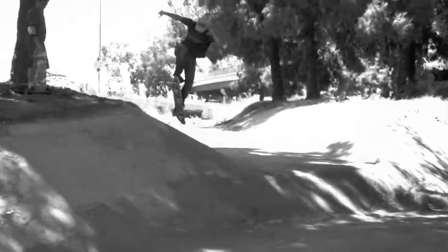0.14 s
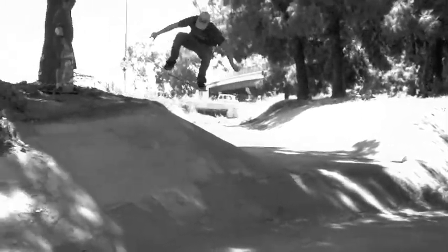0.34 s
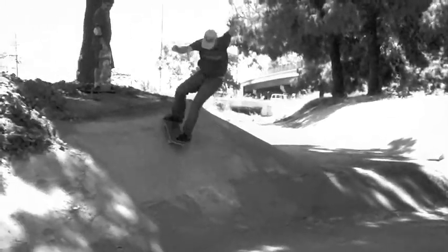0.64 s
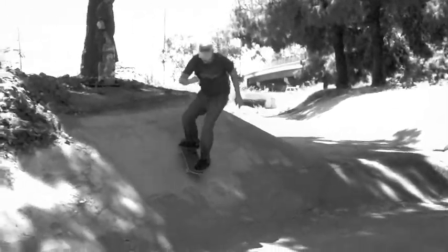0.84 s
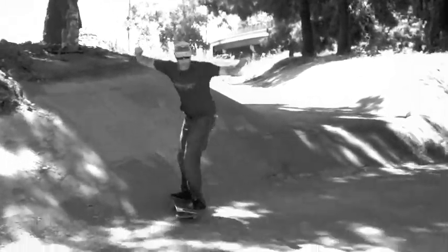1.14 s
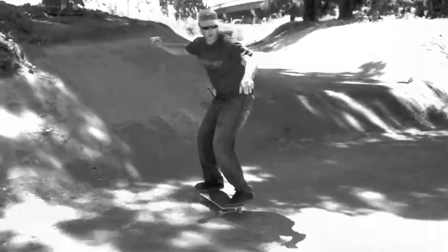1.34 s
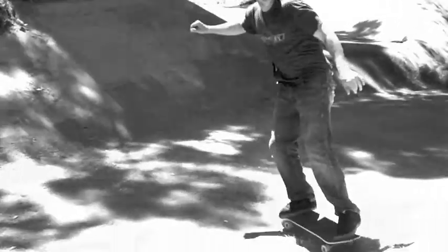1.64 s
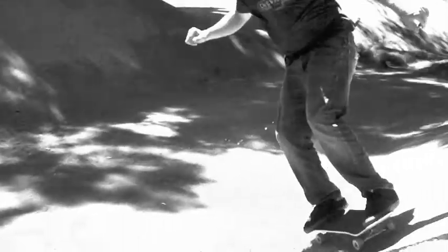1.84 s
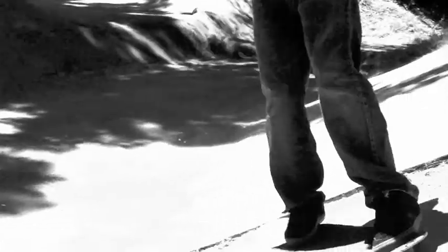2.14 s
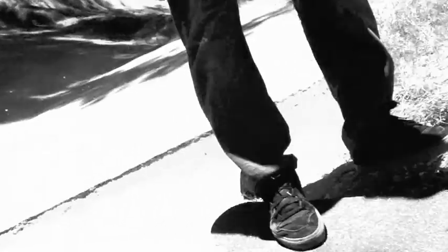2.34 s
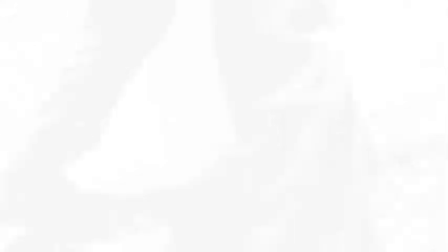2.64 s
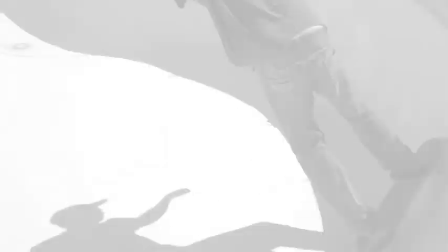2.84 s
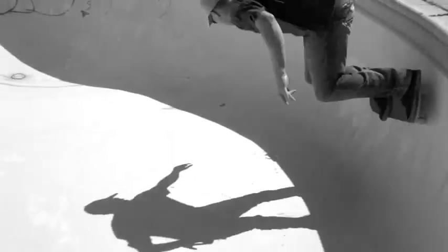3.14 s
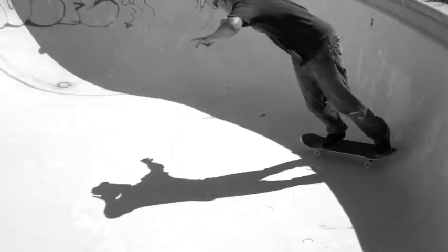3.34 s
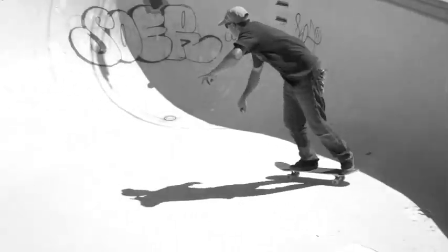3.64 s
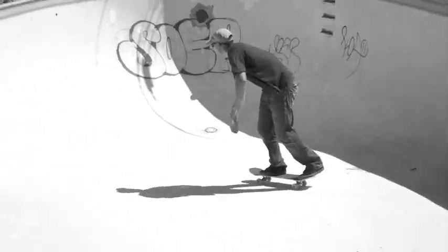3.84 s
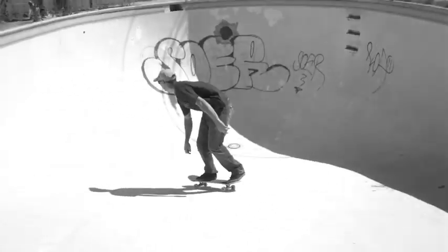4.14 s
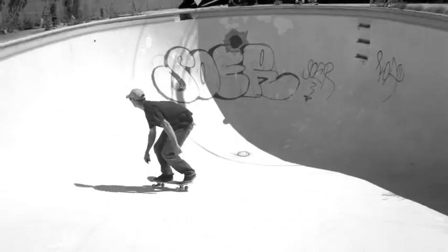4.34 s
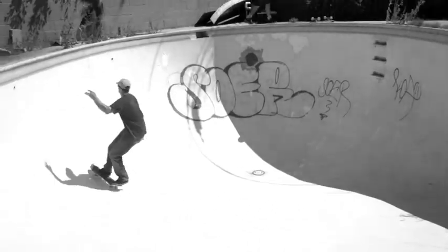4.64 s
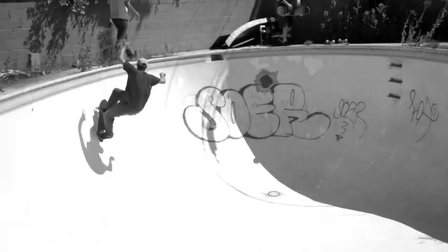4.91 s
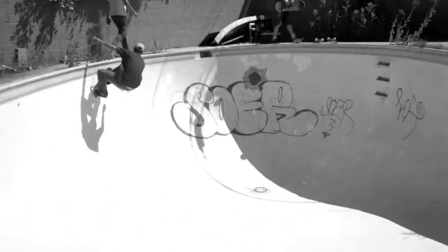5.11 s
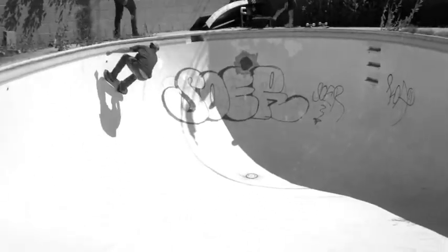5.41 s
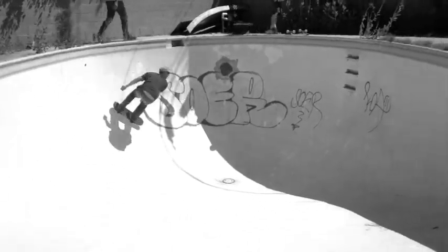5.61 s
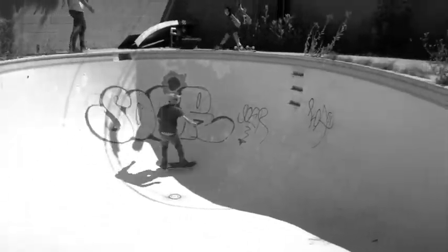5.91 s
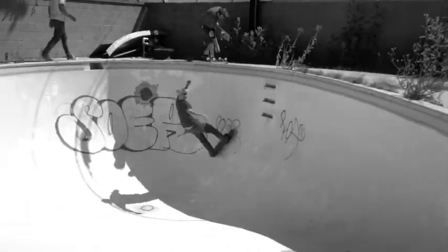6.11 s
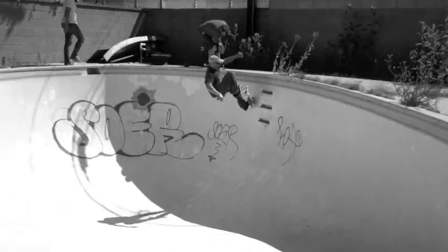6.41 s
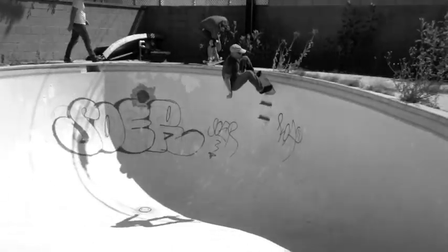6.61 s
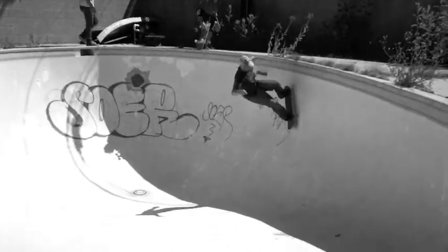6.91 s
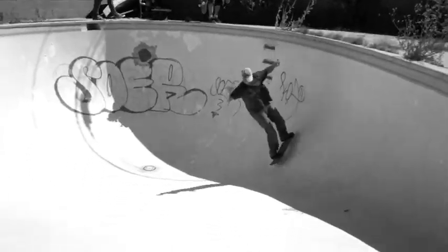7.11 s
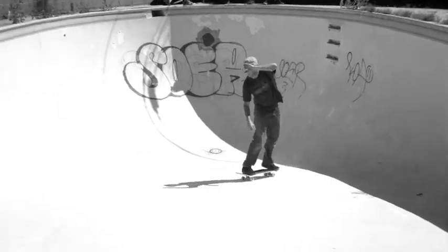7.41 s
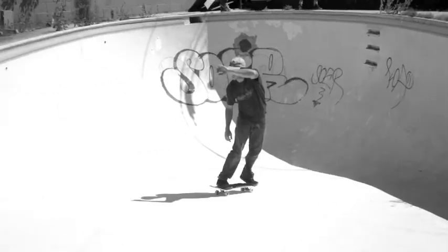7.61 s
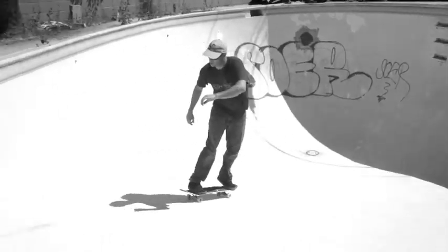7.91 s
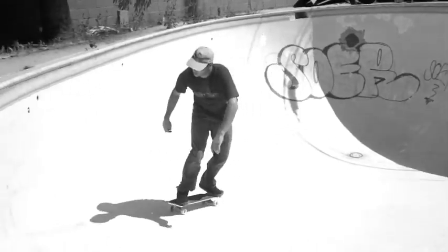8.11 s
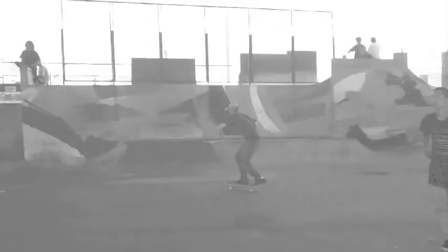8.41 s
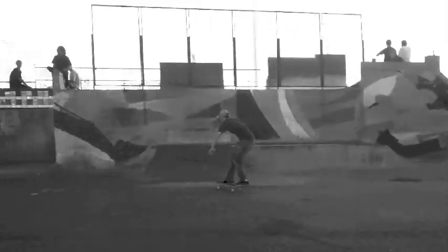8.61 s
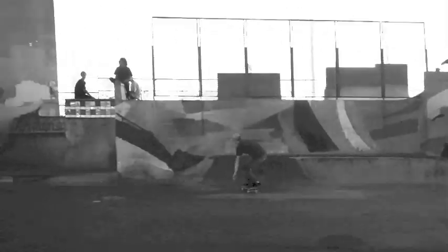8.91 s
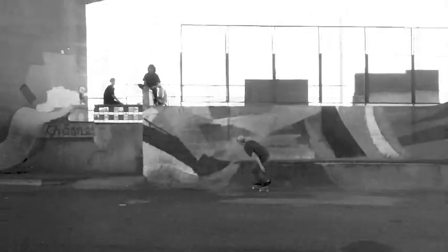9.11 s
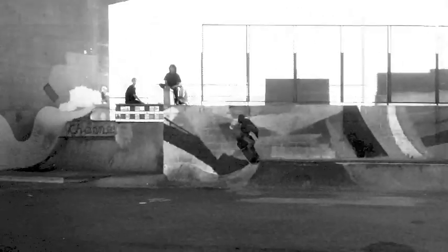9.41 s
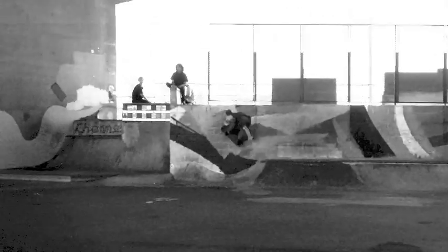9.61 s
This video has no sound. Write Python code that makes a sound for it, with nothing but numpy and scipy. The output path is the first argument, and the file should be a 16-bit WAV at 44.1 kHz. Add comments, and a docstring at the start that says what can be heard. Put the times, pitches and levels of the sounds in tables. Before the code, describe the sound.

Three skateboard runs on outdoor concrete, picked up in stereo. First come a loud deck clack and a gritty wheel rumble dotted with knocks. The sound cuts out for an instant, then returns in an empty pool, where steel trucks clink and the wheels swell, growl and scrape through turns, easing off before a clattering landing. Last, coasting wheels hum and sink slightly in pitch, with soft thumps and closing knocks from the board.

```python
"""Three skateboard runs. First a concrete ditch: hard wheels roar over the grain, tick on pebbles, growl
and skid in the turns; the deck clacks on take-offs and landings. After a brief silence, from 2.4 s, an
empty swimming pool: the trucks clink on its edge and the wheels carve through more turns. From 7.8 s a
skate park: the coasting wheels drone, sinking in pitch, and the deck clacks again near the end.
A closely spaced stereo microphone picks it all up."""
import sys
import numpy as np
from scipy import signal
from scipy.fft import rfft, irfft, next_fast_len
from scipy.io import wavfile
from scipy.ndimage import uniform_filter1d

SR = 44100
rng = np.random.default_rng(int(sys.argv[2]) if len(sys.argv) > 2 else 0)


def generate_wav(sig):
    """Save sig (samples, or channels by samples) to the path in sys.argv[1] as 16-bit PCM at SR."""
    pcm = np.round(np.clip(np.atleast_2d(sig).T, -1, 1) * 32767).astype(np.int16)
    wavfile.write(sys.argv[1], SR, pcm)


N = 429975
TIME_S = np.arange(N) / SR
DITCH_SPAN_S, POOL_SPAN_S, PARK_SPAN_S = (0, 2.303), (2.378, 7.96), (7.83, 9.76)

# Rolling level, set by speed, load and nearness. Each row: time in seconds, level in dB.
DITCH_ROLL = [(0, -34), (.4, -35), (.55, -32), (.7, -42), (1.1, -33.5), (1.4, -39), (1.53, -39), (1.7, -29),
              (1.86, -37.5), (2.03, -34.5), (2.28, -29.5)]
POOL_ROLL = [(2.44, -33.5), (2.6, -41.5), (2.8, -36.5), (2.94, -29.5), (3.22, -34.5), (3.37, -30.5),
             (3.6, -35), (3.95, -38), (4.68, -35), (4.96, -26.5), (5.1, -35), (5.28, -27.5), (5.37, -37.5),
             (5.8, -26.5), (6.04, -27.5), (6.15, -26.5), (6.32, -27.5), (6.48, -38.5), (6.75, -47.5),
             (7.05, -37), (7.38, -31), (7.52, -38), (7.85, -37)]
PARK_ROLL = [(7.88, -33.5), (8.1, -30), (8.5, -30), (9.1, -32), (9.55, -32), (9.75, -34)]
# Treble. Each row: time in seconds, grit hiss gain in dB, finest hiss gain in dB.
TREBLE = [(0, 1.5, -10.5), (.6, 0, -9.5), (1.25, 0.5, -0.5), (1.7, -0.5, 5), (2.7, 1.5, 2.5), (3.3, 6, -1),
          (3.95, -4, 2), (4.2, 2.5, -3), (4.7, -1, 1.5), (5.12, 3.5, 1), (5.27, 2.5, 1.5),
          (5.37, 0.5, -0.5), (5.7, -2.5, 3), (6.15, -1, -6), (6.9, 11, -5), (7.25, -2, -3.5),
          (7.7, -1.5, 5), (8.4, -2.5, 2), (9.75, 1, 3)]
# Steel and alloy trucks. Each row: frequency in Hz, gain in dB, t60 in seconds.
TRUCK_MODES = [(3350, -24, 0.015), (3650, 7, 0.033), (4010, 9, 0.01), (6690, 10.5, 0.023)]
# Hard contact of urethane, steel and concrete. Each row: frequency in Hz, gain in dB.
CRACK_TONE = [(1200, -32), (2600, 10), (3200, 5.5), (3650, -4.5), (4300, 2), (5000, -9.5), (6700, -9.5),
              (8500, -6.5), (10000, -19), (14000, -12.5)]


def from_db(db):
    """Decibels to gain."""
    return np.exp(np.asarray(db) * (np.log(10) / 20))


def rms_one(x):
    """Scale to unit power."""
    return x / np.sqrt(np.mean(x ** 2) + 1e-20)


def peak_one(x):
    """Scale the loudest 3 ms to unit power."""
    return x / np.sqrt(uniform_filter1d(x ** 2, size=132).max() + 1e-20)


def evened(x):
    """Level out over 50 ms, keeping faster roughness."""
    return x / np.sqrt(uniform_filter1d(x ** 2, size=2205) + 1e-9)


def curve(rows, t, column=1):
    """Read a (seconds, value, ..) table at times t."""
    columns = np.transpose(rows)
    return np.interp(t, columns[0], columns[column])


def gain_at(points, hz):
    """Read a (Hz, dB) table as gain on a log-frequency axis."""
    table_hz, db = np.transpose(points)
    return from_db(np.interp(np.log(hz + 1), np.log(table_hz), db))


def coloured(x, points):
    """Filter by a (Hz, dB) table; unit power."""
    size = x.shape[-1]
    return rms_one(irfft(rfft(x) * gain_at(points, np.fft.rfftfreq(size, 1 / SR)), size))


def band(x, low_hz, high_hz):
    """Butterworth band-pass."""
    return signal.sosfilt(signal.butter(2, [low_hz, high_hz], "band", fs=SR, output="sos"), x)


def drift(rate_hz, size):
    """Smooth random curve, spread near 1."""
    knots = rng.standard_normal(4000)
    return np.interp(np.arange(size) / SR * rate_hz, np.arange(len(knots)), knots)


def ring(x, hz, t60_s):
    """One damped mode; a unit click rings at height 1."""
    r, w = from_db(-60 / (t60_s * SR)), 2 * np.pi * hz / SR
    return signal.lfilter([.5, 0, -.5], [1, -2 * r * np.cos(w), r * r], x + 1e-18)


def resonance(hz, width_hz, size):
    """Noise shakes one narrow mode; unit power."""
    t60_s = np.log(1000) / (np.pi * width_hz)
    return rms_one(band(ring(rng.standard_normal(size), hz, t60_s), hz / 1.165, hz * 1.21))


def add(out, start_s, x):
    """Mix x into out."""
    at = max(round(start_s * SR), 0)
    out[..., at:at + x.shape[-1]] += x[..., :N - at]


def part_levels(roll, rumble, parts, t):
    """Rumble, roar, rattle and hiss in dB; the last three follow the rolling level."""
    roll_db = curve(roll, t)
    mean_db = roll_db.mean()
    roar, rattle, hiss = [mean_db + db + swing * (roll_db - mean_db) for db, swing in parts]
    return curve(rumble, t), roar, rattle, hiss + curve(TREBLE, t)


def rolling(roll, rumble, parts, tone, width, span_s, fades_s,
            pebbles_per_s, pebble_db, pebble_s, judder_db, flicker_db):
    """Wheels on concrete: fine grain plus a burst per pebble. Returns front and side."""
    # Crossovers between rumble, roar, rattle and hiss, in Hz.
    splits_hz = [380, 1050, 2600]
    start_s, end_s = span_s
    size = next_fast_len(int((end_s - start_s) * SR), real=True)
    t, hz = start_s + np.arange(size) / SR, np.fft.rfftfreq(size, 1 / SR)
    sizes_db = 3.5 * np.minimum(rng.exponential(1, size), 3)
    pebbles = (rng.random(size) < pebbles_per_s / SR) * from_db(pebble_db + sizes_db)
    # The wheel climbs each pebble and rolls off.
    r = np.exp(-1 / (pebble_s * SR))
    bursts = signal.lfilter([np.e * (1 - r)], [1, -2 * r, r * r], pebbles ** 2 + 1e-18)
    load = from_db(judder_db * drift(70, size))
    contact = rms_one(np.sqrt(1 + bursts) * load)
    grain = rfft(contact * rng.standard_normal((2, size))) * gain_at(tone, hz) * hz / np.hypot(hz, 45)
    grain[1] *= gain_at(width, hz)
    lowpasses = [0] + [1 / (1 + (hz / split) ** 10) for split in splits_hz] + [1]
    wheels = 0
    for k, level_db in enumerate(part_levels(roll, rumble, parts, t)):
        part = irfft(grain * (lowpasses[k + 1] - lowpasses[k]), size)
        wheels += part / part[0].std() * from_db(level_db + flicker_db * drift(50, size))
    fade = np.clip((t - start_s) / fades_s[0], 0, 1) * np.clip((end_s - t) / fades_s[1], 0, 1)
    out = np.zeros((2, N))
    add(out, start_s, wheels * fade)
    return out


def ditch_run():
    """Wheels roll through the ditch, ticking sharply on pebbles."""
    # Deck rumble. Each row: time in seconds, level in dB.
    rumble = [(0, -34.5), (.15, -50), (.52, -36.5), (.7, -46.5), (.92, -46.5), (1.17, -32.5), (1.4, -43),
              (1.7, -38), (2.28, -38)]
    # Wheel roar, truck rattle, grit hiss. Each row: dB re rolling, share of its swing.
    parts = [(-0.5, 0.94), (-4.5, 1), (-7, 0.78)]
    # Wheel spectrum. Each row: frequency in Hz, gain in dB.
    tone = [(50, -29), (100, -8.5), (160, -5), (260, -1.5), (400, -5.5), (520, -7), (700, -5), (950, -3.5),
            (1300, -1.5), (1750, -5.5), (2300, -8.5), (3800, -25.5), (7000, -28.5), (13000, -24.5)]
    # Sound from the sides. Each row: frequency in Hz, dB re front.
    width = [(60, 15), (150, -6), (300, -11.5), (550, -11), (900, -16), (2000, -1), (4000, -0.5),
             (10000, -2.5)]
    return rolling(DITCH_ROLL, rumble, parts, tone, width, DITCH_SPAN_S, fades_s=(.003, .03),
                   pebbles_per_s=45, pebble_db=-3.5, pebble_s=.00054, judder_db=1.0, flicker_db=1.64)


def bank_reflection(x, lag_s, gain, wander):
    """A reflection hollows out the roar; its path changes as the skater moves."""
    delay_s = lag_s * np.exp(wander * drift(1.2, N))
    echo = np.array([np.interp(TIME_S - delay_s, TIME_S, channel) for channel in x])
    return (x + gain * echo) / np.sqrt(1 + gain ** 2)


def glinting(x, above_hz, flicker_db):
    """The finest hiss comes and goes as the wheels turn toward the listener."""
    top = signal.sosfiltfilt(signal.butter(2, above_hz, "high", fs=SR, output="sos"), x)
    top_db = curve(TREBLE, TIME_S, column=2) + flicker_db * drift(60, N)
    return x + top * (from_db(top_db) - 1)


def singing():
    """Rolling keeps deck and trucks ringing faintly."""
    # Each row: frequency in Hz, width in Hz, dB re rolling.
    modes = [(1707, 28, -18), (4250, 960, -22.5)]
    roll_db = curve(DITCH_ROLL + POOL_ROLL + PARK_ROLL, TIME_S)
    return sum(from_db(roll_db + db) * resonance(hz, width_hz, N) for hz, width_hz, db in modes)


def breeze(level_db, low_hz, high_hz):
    """Light air on the microphone ports, swelling slowly."""
    return from_db(level_db + 1.5 * drift(2, N)) * rms_one(band(rng.standard_normal(N), low_hz, high_hz))


def struck(force, modes, centre_hz, falloff_db_per_oct, band_hz):
    """A force rings modes; where it lands weights them by their distance from centre_hz."""
    detunes = 1 + .012 * rng.standard_normal(len(modes))
    out = 0
    for k, ((hz, db, t60_s), detune) in enumerate(zip(modes, detunes)):
        gain = from_db(db - falloff_db_per_oct * abs(np.log2(hz / centre_hz)))
        out += (-1) ** k * gain * ring(force, hz * detune, t60_s)
    return peak_one(band(out, *band_hz))


def blow(knock_db, thud_db, crack_db, ring_hz, chatter_s, steel_hz=3800, steel_re_crack_db=-5):
    """An impact, then dying chatter of loose trucks; both ring the board. Returns front and side."""
    # Maple deck on its trucks. Each row: frequency in Hz, gain in dB, t60 in seconds.
    deck_modes = [(490, -3, 0.036), (600, 11, 0.018), (700, 7, 0.026), (850, 5, 0.021), (1040, 3.5, 0.022),
                  (1155, 2.5, 0.016), (1350, 2, 0.028), (1500, 10.5, 0.0074), (1800, 5, 0.021),
                  (2000, -2, 0.01), (471, -14, 0.076), (1099, -11, 0.088), (1300, -12.5, 0.16),
                  (1864, -3.5, 0.1)]
    # Thud of the rider's weight. Each row: frequency in Hz, gain in dB, t60 in seconds.
    thud_modes = [(186, 1, 0.037), (258, 17, 0.011), (344, 7.5, 0.033), (451, -6, 0.079)]
    t = np.arange(4096) / SR
    rattle = rng.standard_normal((2, len(t))) * np.exp(-t / chatter_s)
    rattle *= 1 - np.exp(-t / .0019)   # wheels compress before they bite
    force = (t == 0) + .091 * rattle[0]
    knock = from_db(knock_db) * struck(force, deck_modes, ring_hz, 16, band_hz=(354, 2980))
    thud = from_db(thud_db) * struck(force, thud_modes, 323, .5, band_hz=(170, 600))
    side = from_db(knock_db - 20) * struck(rattle[1], deck_modes, ring_hz, -3, band_hz=(500, 3200))
    padded = np.pad(rattle, ((0, 0), (0, len(t))))
    crack = from_db(crack_db) * peak_one(coloured(padded, CRACK_TONE)[:, :len(t)])
    steel = struck(force, TRUCK_MODES, steel_hz, 14, band_hz=(2800, 8100))
    steel *= from_db(crack_db + steel_re_crack_db)
    return np.array([knock + thud + steel, side]) + crack


def clacks():
    """The wooden deck clacks on pops, landings and rough patches."""
    # Each row: start in seconds, knock in dB, favoured ring in Hz, contact hardness in dB,
    # chatter decay in seconds, thud in dB re knock.
    hits = [(0.086, -17.5, 1010, 13, 0.0099, -10), (0.5818, -7, 960, 7.5, 0.0027, -8),
            (0.602, -24, 1250, 8, 0.0022, -4), (0.622, -24, 1250, -4, 0.0045, -9),
            (0.631, -20.5, 600, 7, 0.004, -7), (0.661, -35, 1330, -8, .002, -19),
            (0.679, -27.5, 1330, -1, .003, -9), (0.823, -31, 1330, -6, 0.0092, -6),
            (1.001, -25.5, 990, -6, 0.0038, -7), (1.4, -32, 1500, 12, 0.0093, -2),
            (1.42, -28.5, 1180, 13, 0.0038, 1.5), (1.475, -30, 900, -4, 0.0049, 5),
            (1.482, -29.5, 1350, 12, 0.0034, -5), (1.563, -28, 980, 5, 0.0063, -5),
            (1.627, -26, 657, -4, 0.0018, -11), (1.648, -29, 1040, -2, .002, -8),
            (1.663, -21, 850, -4, 0.0032, -6), (1.68, -19.5, 700, 0, .002, -9),
            (1.704, -23, 1300, 2, .003, -1), (1.719, -27, 1090, -4, .002, 1),
            (1.772, -15, 980, -11, 0.002, -6), (1.9235, -16, 845, -8, 0.0018, -2.5),
            (1.956, -20, 1100, 4, 0.0044, -3), (2.111, -23.5, 1230, -4, .003, 3),
            (2.26, -22, 860, 3, 0.0038, -3), (2.417, -31, 740, 16, .003, -9),
            (2.433, -23, 820, 11.5, 0.0066, -6), (3.311, -25, 1490, -1, 0.0044, -14),
            (5.42, -23.5, 1500, 1, 0.0017, -18), (6.505, -20, 1800, 11, 0.0043, -9),
            (6.515, -20, 1350, 10, 0.0067, -12), (6.9255, -25.5, 790, 10, 0.015, 5.5),
            (6.931, -26, 1700, 7, .005, -8), (6.958, -20.5, 1100, 5, 0.0043, 0),
            (6.971, -21, 1600, -2, .002, -8), (6.9771, -13, 1400, -7, 0.0027, -10),
            (6.989, -22, 1100, -4, 0.0029, 1), (7.004, -24, 600, -12, 0.012, -3),
            (9.523, -30.5, 1700, 3, 0.013, -8), (9.596, -19, 1110, 2, 0.0068, -6),
            (9.613, -21, 1120, 5, 0.0082, -12), (9.634, -28, 1180, 3, 0.009, -13)]
    out = np.zeros((2, N))
    for start_s, db, ring_hz, hardness_db, chatter_s, thud_db in hits:
        add(out, start_s, blow(db, db + thud_db, db - 21.5 + hardness_db, ring_hz, chatter_s))
    return out


def wall_echoes(x, t60_s, wet_db, cutoff_hz):
    """Scattered, dull reflections from the concrete banks."""
    t = np.arange(SR // 2) / SR
    echoes = rng.standard_normal((2, len(t))) * (rng.random((2, len(t))) < .02)
    echoes *= (t > .008) * from_db(-60 * t / t60_s)
    echoes = signal.sosfilt(signal.butter(1, cutoff_hz, fs=SR, output="sos"), echoes)
    echoes /= np.sqrt(np.sum(echoes ** 2, axis=1, keepdims=True))
    return from_db(wet_db) * signal.fftconvolve(x[None], echoes, axes=1)[:, :N]


def hollow_knocks(rise_cycles):
    """A soft push starts a tone that dies within a few cycles."""
    # Each row: start in seconds, pitch in Hz, envelope peak in dB.
    knocks = [(0.412, 203, -33), (0.445, 180, -31), (0.49, 230, -32), (6.927, 422, -26),
              (7.003, 486, -12.5), (8.777, 530, -17), (9.287, 580, -17.5), (9.597, 580, -13.5),
              (9.597, 1180, -14.5), (9.612, 570, -14.5), (9.615, 1140, -17.5)]
    out, t = np.zeros(N), np.arange(4096) / SR
    for start_s, hz, peak_db in knocks:
        age = t * hz / rise_cycles
        add(out, start_s, from_db(peak_db) * age * np.exp(1 - age) * np.sin(2 * np.pi * hz * t))
    return out


def skids(stutter_db, side_db):
    """Urethane grips and slips sideways in a short, rough bark."""
    # Each row: start in seconds, hold in seconds, scrape in dB, hiss in dB.
    slides = [(0.621, 0.0084, -28.5, -48), (2.213, 0.1, -34, -45.5), (3.018, 0.014, -30, -34),
              (5.515, 0.05, -20.5, -55), (6.5, 0.03, -41, -37.5), (6.95, 0.064, -26, -38.5)]
    # Scrape spectrum. Each row: frequency in Hz, gain in dB.
    scrape_tone = [(100, -21), (300, -20), (700, 6), (1400, 0.5), (2000, -3.5), (3000, -15), (8000, -17)]
    out, t = np.zeros((2, N)), np.arange(8192) / SR
    for start_s, hold_s, scrape_db, hiss_db in slides:
        envelope = np.minimum(t / .0006, 1) * np.exp(-np.maximum(t - hold_s, 0) / .015)
        slips = rng.standard_normal((2, len(t))) * from_db(stutter_db * drift(402, len(t)))
        scrape = from_db(scrape_db) * coloured(slips, scrape_tone) * from_db([[0], [side_db]])
        hiss = from_db(hiss_db) * coloured(slips, CRACK_TONE)
        add(out, start_s, envelope * (scrape + hiss))
    return out


def squeaks_and_whirrs():
    """Short wheel squeaks and swishes, and the high whirr of spinning wheels."""
    # Each row: centre in seconds, length in seconds, pitch in Hz, width in Hz, level in dB.
    sounds = [(0.879, 0.022, 1620, 220, -30), (1.275, 0.12, 3350, 100, -44),
              (1.843, 0.035, 1670, 320, -26.5), (2.248, .1, 3260, 300, -43), (6.151, 0.27, 3670, 910, -40),
              (6.595, 0.071, 3500, 900, -46), (6.76, .34, 4160, 900, -63), (6.96, 0.022, 4060, 600, -38),
              (8.3, 0.9, 4100, 300, -53), (8.466, .18, 1680, 101, -33)]
    out = np.zeros(N)
    for centre_s, length_s, hz, width_hz, db in sounds:
        swell = np.hanning(int(length_s * SR))
        add(out, centre_s - length_s / 2, from_db(db) * swell * resonance(hz, width_hz, len(swell)))
    return out


def grit_ticks(spread_db, wood_hz, steel_hz):
    """Uneven grains of coarse concrete tick in deck and trucks."""
    # Each row: start and end in seconds, grains per second, deck and truck ticks in dB re rolling.
    patches = [(0.901, 2.298, 170, -5, -21), (2.978, 3.464, 300, -6.5, -13), (4.7, 6.4, 180, -11, -26)]
    out = np.zeros(N)
    for start_s, end_s, grains_per_s, wood_db, steel_db in patches:
        t = np.arange(start_s, end_s, 1 / SR)
        sizes = from_db(spread_db * np.minimum(rng.exponential(1, len(t)), 3))
        grains = sizes * rng.choice([-1, 1], len(t)) * (rng.random(len(t)) < grains_per_s / SR)
        wood = band(band(grains, *wood_hz), *wood_hz)
        steel = struck(grains, TRUCK_MODES, steel_hz, 4.5, band_hz=(2800, 8100))
        ticks = from_db(wood_db) * rms_one(wood) + from_db(steel_db) * rms_one(steel)
        envelope = from_db(curve(DITCH_ROLL + POOL_ROLL, t)) * signal.windows.tukey(len(t)) ** .5
        add(out, start_s, ticks * envelope)
    return out


def growls():
    """Each turn loads the wheels: their resonance swells, glides and dies away."""
    # Each row: centre in seconds, length in seconds, pitch in Hz, width in Hz, level in dB,
    # glide in octaves per second.
    turns = [(1.08, 0.32, 1086, 80, -36.5, 0), (1.692, 0.57, 312, 130, -28, 0),
             (2.21, .3, 330, 160, -26.5, 0), (2.558, 0.47, 335, 40, -34, 0.11),
             (2.77, .1, 204, 60, -31, -0.42), (2.93, .2, 318, 90, -26, 0.042),
             (2.936, 0.14, 490, 80, -28.5, 1.5), (3.269, 0.54, 1500, 95, -31, 0.019),
             (4.835, 0.27, 642, 62, -25, 1.3), (4.97, 0.18, 1450, 95, -31, 0.45),
             (5.229, 0.36, 782, 68.5, -29.5, .6), (5.84, 0.33, 444, 55, -22.5, -.7),
             (5.848, 0.26, 1460, 94.8, -31.5, -.3), (5.952, 0.24, 600, 60, -23.5, 0.395),
             (6.155, .17, 428, 55, -19.5, -0.42), (6.147, 0.32, 650, 62, -24, -0.5),
             (7.03, 0.088, 470, 55, -29.5, 0), (7.3, 0.33, 463, 55, -37, 0.27),
             (7.36, 0.27, 610, 62, -28.5, -0.5), (9.71, 0.2, 438, 25, -35, 0)]
    out = np.zeros(N)
    for centre_s, length_s, hz, width_hz, db, glide_oct_per_s in turns:
        swell = np.hanning(int(length_s * SR))
        pitch_ratio = 2 ** (glide_oct_per_s * (np.arange(len(swell)) / SR - length_s / 2))
        steady = evened(resonance(hz, width_hz, 2 * len(swell)))
        gliding = np.interp(np.cumsum(pitch_ratio), np.arange(len(steady)), steady)
        add(out, centre_s - length_s / 2, from_db(db) * swell * rms_one(gliding))
    return out


def thumps():
    """Loaded wheels thump over joints in the concrete."""
    # Each row: start in seconds, thud in dB.
    joints = [(2.11, -22.5), (2.266, -19.5), (8.621, -22), (8.9, -26)]
    out = np.zeros((2, N))
    for start_s, db in joints:
        add(out, start_s, blow(db - 17, thud_db=db, crack_db=db - 33, ring_hz=810, chatter_s=.0074))
    return out


def pool_run():
    """Wheels roll through the empty pool, with softer pebble ticks."""
    # Deck rumble. Each row: time in seconds, level in dB.
    rumble = [(2.45, -37.5), (2.93, -28), (3.06, -38), (3.45, -36.5), (4.0, -39), (4.35, -35.5),
              (4.55, -29.5), (4.97, -32), (5.5, -38.5), (5.75, -33), (6.35, -34.5), (6.7, -44.5),
              (6.92, -37), (7.7, -41.5)]
    # Wheel roar, truck rattle, grit hiss. Each row: dB re rolling, share of its swing.
    parts = [(1.5, 1.01), (-5.5, 1.05), (-9, 1.25)]
    # Wheel spectrum. Each row: frequency in Hz, gain in dB.
    tone = [(50, -37), (100, -15.5), (160, -3), (260, -1.5), (400, 0), (520, 1), (700, 0.6), (950, -2),
            (1300, -0.5), (1750, -3), (2300, -18.5), (3800, -32), (7000, -32.5), (13000, -32)]
    # Sound from the sides. Each row: frequency in Hz, dB re front.
    width = [(60, 16), (150, -5.5), (300, -7.5), (550, -8), (900, -10), (2000, 0), (4000, 1), (10000, -2.5)]
    return rolling(POOL_ROLL, rumble, parts, tone, width, POOL_SPAN_S, fades_s=(.008, .08),
                   pebbles_per_s=53, pebble_db=-9, pebble_s=.00056, judder_db=1.06, flicker_db=2)


def sheen(half_width_hz, flicker_db):
    """A bright band of wheel hiss shifts as the board carves, from the pool on."""
    # Each row: time in seconds, centre in Hz, level in dB.
    track = [(2.4, 9200, -63), (2.6, 8800, -49.5), (2.9, 7640, -55), (3.4, 7140, -47), (3.9, 8440, -54),
             (4.2, 9130, -54.5), (4.6, 8400, -57), (5.05, 5960, -58), (5.27, 6530, -40.5), (5.4, 6570, -62),
             (5.9, 7240, -51), (6.4, 8700, -51), (6.65, 8800, -63), (7.3, 8280, -50.5), (7.7, 8780, -55),
             (8.0, 7540, -51.5), (8.6, 6670, -57), (9.75, 6400, -57)]
    lowpass = signal.butter(2, half_width_hz, fs=SR, output="sos")
    grain = signal.sosfilt(lowpass, rng.standard_normal((2, N)))
    phase = 2 * np.pi * np.cumsum(curve(track, TIME_S)) / SR
    hiss = rms_one(grain[0] * np.cos(phase) + grain[1] * np.sin(phase))
    level_db = curve(track, TIME_S, column=2) + flicker_db * drift(45, N)
    return hiss * from_db(level_db) * (TIME_S > POOL_SPAN_S[0])


def clinks():
    """Steel trucks strike the pool's edge."""
    # Each row: start in seconds, base level in dB, deck knock in dB.
    hits = [(2.811, -29.5, -30), (2.971, -17, -26), (2.98, -23, -28), (3.026, -26, -22), (3.101, -29, -31),
            (3.127, -30.5, -20.5), (3.18, -30.5, -23), (3.2, -33, -28), (3.288, -23, -18.5),
            (3.294, -29, -25), (3.349, -29.5, -30), (3.407, -32, -24.5)]
    out = np.zeros((2, N))
    for start_s, db, knock_db in hits:
        add(out, start_s, blow(knock_db, thud_db=db - 15, crack_db=db - 2, ring_hz=1370,
                               chatter_s=.0029, steel_hz=4960, steel_re_crack_db=-1))
    return out


def park_run():
    """Wheels coast across the park with a steadier, duller roar."""
    # Deck rumble. Each row: time in seconds, level in dB.
    rumble = [(7.9, -35), (9.3, -30.5), (9.75, -36.5)]
    # Wheel roar, truck rattle, grit hiss. Each row: dB re rolling, share of its swing.
    parts = [(1.5, 0.96), (-6.5, 0.72), (-14, 2.4)]
    # Wheel spectrum. Each row: frequency in Hz, gain in dB.
    tone = [(50, -34), (100, -14), (160, -4.5), (260, 4), (400, 2.5), (520, 2.5), (700, 2.5), (950, -6.5),
            (1300, -7.5), (1750, -12), (2300, -11.5), (3800, -22), (7000, -27), (13000, -31)]
    # Sound from the sides. Each row: frequency in Hz, dB re front.
    width = [(60, -7), (150, -4), (300, -8.5), (550, -2), (900, -11.5), (2000, 2), (4000, 1), (10000, -1.5)]
    return rolling(PARK_ROLL, rumble, parts, tone, width, PARK_SPAN_S, fades_s=(.08, .005),
                   pebbles_per_s=39, pebble_db=-7, pebble_s=.0052, judder_db=.5, flicker_db=-1)


def drone(sag_per_s, roughness_hz, fade_s):
    """Rough tones of coasting wheels sink with their speed; a hollow note joins before the ramp."""
    # Each row: starting pitch in Hz, dB re rolling.
    tones = [(600, -4.5), (720, -5.5)]
    # Hollow note. Each row: time in seconds, dB re rolling.
    hollow = [(8.2, -13), (8.75, -1.5), (9.3, -1), (9.55, -4), (9.7, -19)]
    since_s = np.maximum(TIME_S - PARK_SPAN_S[0], 0)
    speed = np.exp(-sag_per_s * since_s)
    out = np.zeros(N)
    for hz, db in tones:
        grain = drift(roughness_hz, N) + 1j * drift(roughness_hz, N)
        phase = 2 * np.pi * hz * np.cumsum(speed) / SR
        out += from_db(db) * evened(np.real(grain * np.exp(1j * phase)))
    out += from_db(curve(hollow, TIME_S)) * evened(resonance(hz=516, width_hz=18, size=N))
    return out * from_db(curve(PARK_ROLL, TIME_S)) * np.minimum(since_s / fade_s, 1)


def scene():
    """Three runs, panned with the board; brief silence after the first."""
    # Board position. Each row: time in seconds, left minus right in dB.
    bearing = [(0, 4.5), (2.2, -1), (2.5, 4.5), (3.0, 1), (4.7, 4), (5.3, 0), (5.9, 5.5), (6.3, 1.5),
               (7.7, 2), (8.15, -3.5), (9.75, -3.5)]
    wheels = ditch_run() + pool_run() + park_run()
    wheels = bank_reflection(wheels, lag_s=.014, gain=.32, wander=.12)
    wheels = glinting(wheels, above_hz=7100, flicker_db=-1.5)
    contacts = clacks() + clinks() + thumps() + skids(stutter_db=.5, side_db=-4.5)
    front, side = wheels + contacts + wall_echoes(contacts[0], t60_s=.29, wet_db=-26, cutoff_hz=4070)
    front += hollow_knocks(rise_cycles=1.2)
    front += grit_ticks(spread_db=6, wood_hz=(537, 2000), steel_hz=3600)
    front += growls() + squeaks_and_whirrs() + singing()
    front += sheen(half_width_hz=740, flicker_db=4)
    front += drone(sag_per_s=.09, roughness_hz=100, fade_s=.078)
    side += breeze(level_db=-55.5, low_hz=60, high_hz=180)
    pan_db = curve(bearing, TIME_S)
    pause = np.interp(TIME_S, [2.28, 2.305, 2.375, 2.412, 2.417], [1, 0, 0, .08, 1])
    return pause * np.array([front * from_db(pan_db / 2) + side, front * from_db(-pan_db / 2) - side])


def record(dry):
    """The microphone widens by subtracting delayed crossfeed, rounds peaks and cuts the top."""
    # Each row: frequency in Hz, share taken from the other channel (capped below).
    crossfeed = [(500, 0.02), (1200, 0.58), (2600, 1), (5200, 0.45), (8000, 0.13), (10500, 0.5),
                 (14000, 0.88)]
    delay_s, ceiling, cutoff_hz = .000384, .95, 13980
    size = next_fast_len(N + 4096, real=True)
    hz = np.fft.rfftfreq(size, 1 / SR)
    share = np.clip(np.interp(hz, *np.transpose(crossfeed)), 0, .97)
    spectrum = rfft(dry, size)
    opposite = np.exp(-2j * np.pi * hz * delay_s) * spectrum[::-1]
    wide = irfft((spectrum - share * opposite) / np.sqrt(1 + share ** 2), size)
    rounded = wide / (1 + (wide / ceiling) ** 6) ** (1 / 6)
    lowpass = 1 / np.sqrt(1 + (hz / cutoff_hz) ** 400)
    return irfft(rfft(rounded) * lowpass, size)[:, :N]


dry = scene()
out = record(dry)
generate_wav(out)
```